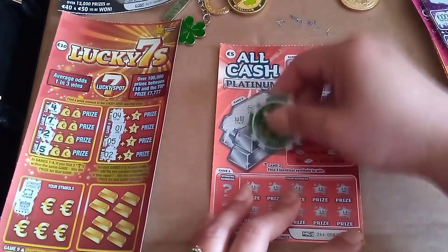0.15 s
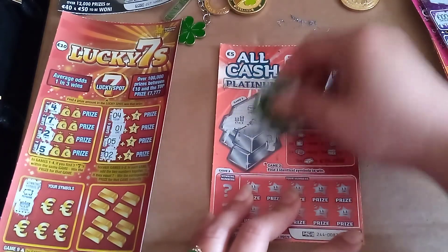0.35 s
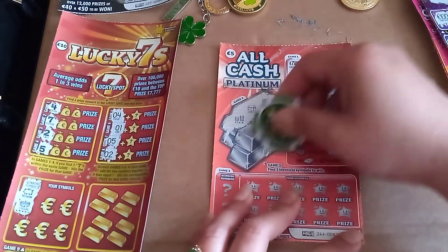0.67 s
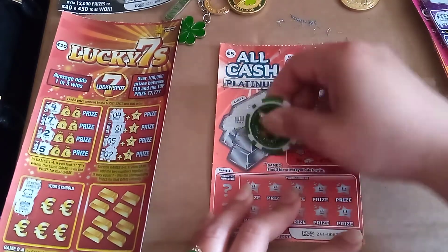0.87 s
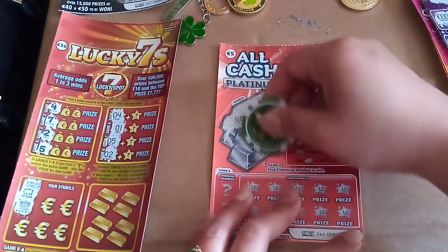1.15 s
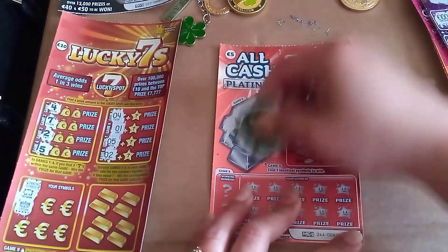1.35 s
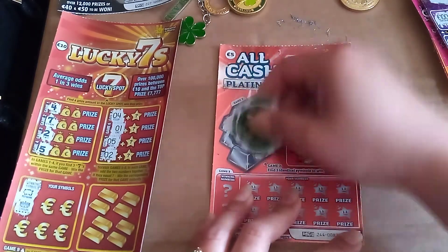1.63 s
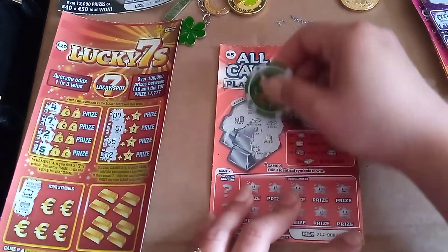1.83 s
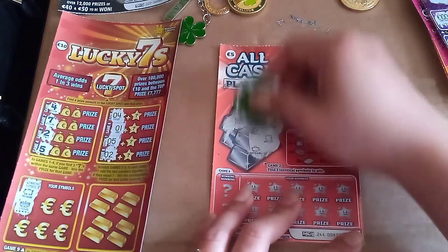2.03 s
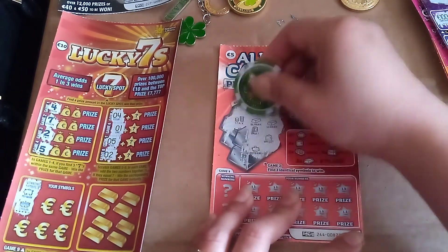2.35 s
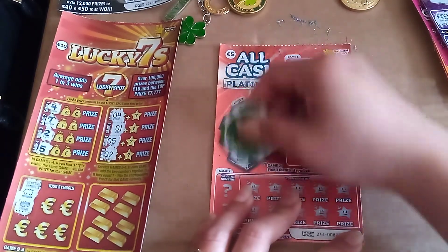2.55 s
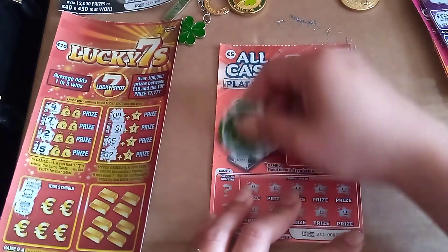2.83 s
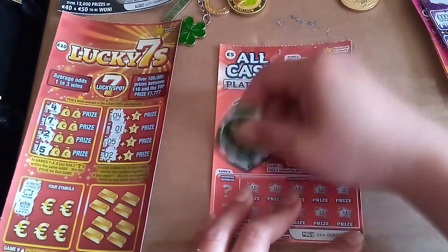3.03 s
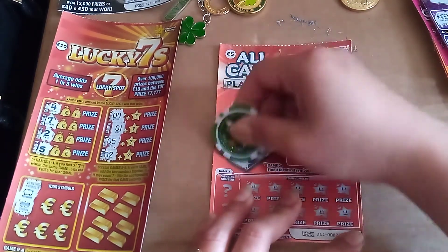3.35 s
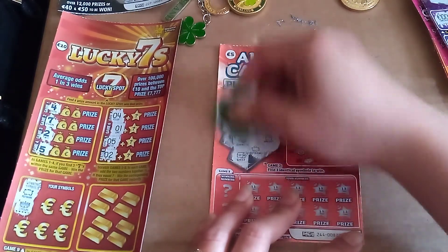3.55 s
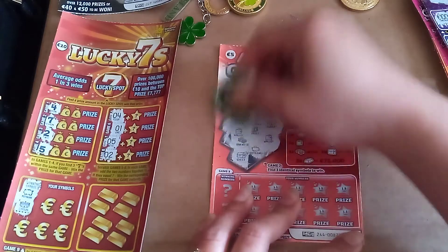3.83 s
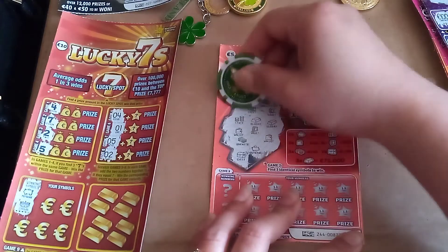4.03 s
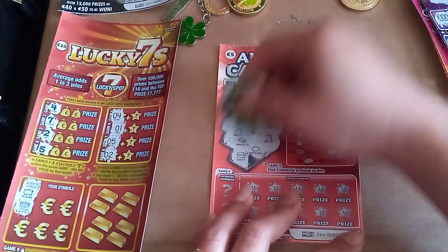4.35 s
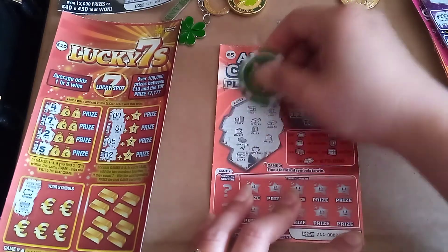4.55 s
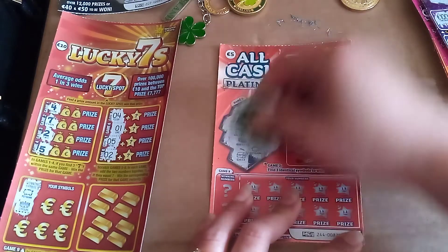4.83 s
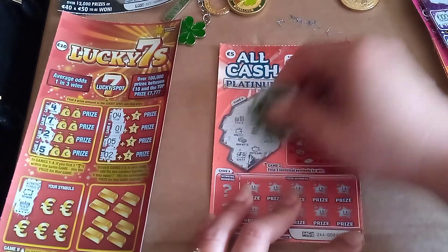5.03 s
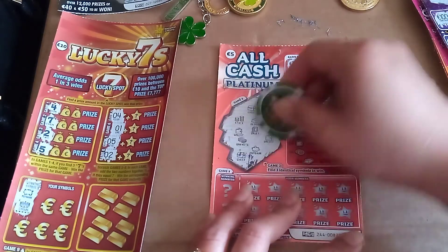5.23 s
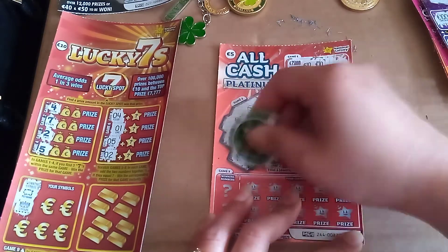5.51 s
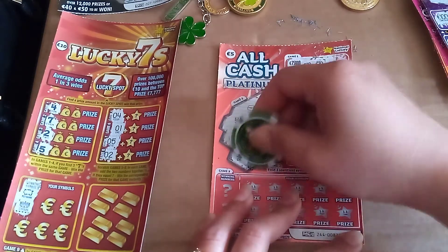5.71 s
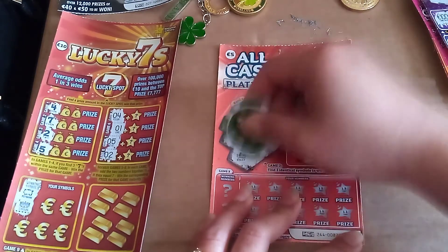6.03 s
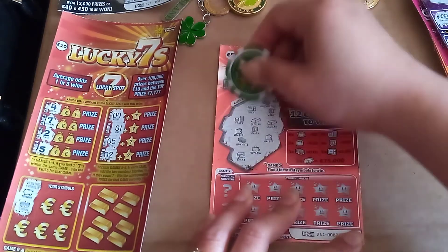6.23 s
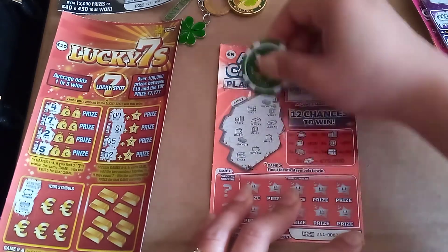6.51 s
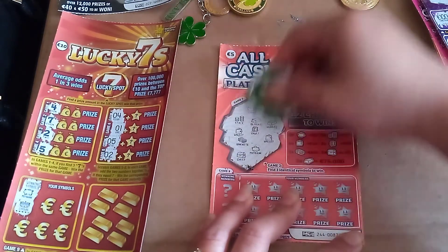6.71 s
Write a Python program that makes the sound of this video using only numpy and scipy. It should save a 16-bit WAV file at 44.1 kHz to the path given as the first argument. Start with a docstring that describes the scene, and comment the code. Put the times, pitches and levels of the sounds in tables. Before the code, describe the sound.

Close up in a quiet room, a scratch card is rubbed rapidly with the edge of a plastic chip. The dry, grainy strokes keep going throughout, uneven in strength, while the wooden table booms and thumps softly below them. The rim ticks now and then, most sharply just past the middle, and squeaks once very briefly a second later. The later strokes sound somewhat duller and softer.

```python
"""Scratching a card on a wooden table

A hard plastic chip scrapes the coating off a card in quick strokes to and fro. Torn grains of coating
ring in chip and card; the drag judders the table top, which booms in a few low modes. Now and then the
chip sticks and jolts the table, or its rim catches with a tick, once with a squeak. Close, in a quiet room.
"""
import sys
import numpy as np
from scipy import signal
from scipy.fft import rfft, irfft
from scipy.io import wavfile

SR = 44100
rng = np.random.default_rng(int(sys.argv[2]) if len(sys.argv) > 2 else 0)


def store_wav(level_fs):
    """Save 16-bit WAV to argv[1]."""
    pcm = np.round(np.clip(np.atleast_2d(level_fs), -1, 1) * 32767)
    wavfile.write(sys.argv[1], SR, pcm.T.astype(np.int16))


N = 303259

# One row a stroke. Crests are in stroke lengths from its start and may lie outside it. Columns:
# start_s, length_s, bite_s (attack), scrape_crest, scrape_db, bright_db,
# sizzle_crest, sizzle_db (relative to the scrape),
# boom_lead_s, boom_crest, boom_db, deep_db, groan_db (both relative to the boom)
STROKES = [(-0.03, 0.049, 0.073, 0.29, -52, 3, 1, -17.5, -0.02, 1.23, -49, -1, -8),
           (0.149, 0.021, 0.028, 0.75, -55, 0, 0.29, -10, 0.021, 1.1, -40, -2, -17),
           (0.25, 0.03, 0.045, 0.87, -57.5, 1, 1.3, -13.5, 0.048, 3.5, -44.5, -5.5, -14),
           (0.402, 0.016, 0.036, 0.5, -57, 3, 0.35, -2.5, 0.022, 2.9, -40, -5.5, -13.5),
           (0.472, 0.065, 0.032, 0.66, -57, 1, 0.74, -6.5, 0.031, 1.4, -45.5, -12, -4.5),
           (0.598, 0.042, 0.014, 1, -62, 7, 0.95, -13, -0.0021, 1.25, -44.5, -2, -16.5),
           (0.718, 0.04, 0.029, 0.76, -60, 1.5, 0.46, -9.5, 0.01, 1.35, -47, -8.5, -20),
           (0.848, 0.029, 0.039, 1.0, -66, 3, 0.84, -13, 0.033, 0.95, -49, -6, -28),
           (0.953, 0.025, 0.029, 0.71, -59.5, 1.5, 0.56, -9, 0.028, 2, -51, -5.5, -6),
           (1.076, 0.038, 0.023, 0.48, -52.5, -2.5, 0.55, -4, 0.0017, -0.76, -38, -3, -19),
           (1.219, 0.049, 0.038, 0.48, -57.5, -4.5, 0.23, -8.5, -0.0059, 0.1, -49, -12, -7),
           (1.359, 0.024, 0.042, 1.0, -51.5, 0, 0.6, -11, 0.0072, -0.1, -36, -3, -17),
           (1.477, 0.041, 0.057, 0.68, -54, 1.5, 0.69, -7.5, -0.013, 0.04, -47, -5, -11.5),
           (1.637, 0.026, 0.034, 0, -54, 3, 0.4, -7, 0.0093, 0.1, -41, -4, -13),
           (1.744, 0.045, 0.022, 0.54, -59, 3.5, 0.51, -12, 0.028, 1.5, -49.5, -6, -9),
           (1.908, 0.032, 0.017, 0.81, -58, 2.5, 0.084, -12, 0.0091, 1.0, -44.5, -5.5, -15),
           (2.041, 0.025, 0.058, 0.56, -59.5, 4.5, 0.71, -8.5, 0.026, 1.0, -51.5, -9, -13),
           (2.195, 0.024, 0.029, 0.27, -55, 4, -0.14, -7.5, 0.011, -0.35, -38.5, -2, -15.5),
           (2.301, 0.042, 0.081, 0.8, -55, 4, 0.9, -10.5, 0.013, 1.6, -47.5, -6, -10),
           (2.47, 0.037, 0.032, 0.65, -53.5, 0.5, 0.75, -5, 0.0092, 0.5, -42, -8.5, -17),
           (2.586, 0.057, 0.063, 0.37, -57.5, 4, 0.75, -5.5, 0.012, 0.53, -54, -5, -8),
           (2.746, 0.048, 0.025, 0.27, -60, 7.5, 0.4, -0.5, 0.0057, -0.35, -43, -4, -14.5),
           (2.874, 0.071, 0.025, 0.29, -61, 4, 0.43, -4.5, 0.024, 0.95, -57.5, -3, -4.5),
           (3.038, 0.019, 0.024, 1, -57, -4, 0.29, -11, 0.03, 1.57, -43, -3.5, -22),
           (3.154, 0.05, 0.032, 0.49, -58, -0.5, 0.69, -9.5, -0.028, 1.08, -52, -6.5, -8.5),
           (3.307, 0.027, 0.015, 0.36, -56.5, -2.5, 0.41, -7, 0.0023, 0.1, -41.5, -3, -15.5),
           (3.438, 0.031, 0.03, 0.61, -61, 5, 0.7, -7, 0.019, 0.7, -52, -4.5, -8.5),
           (3.582, 0.026, 0.013, 0.89, -62, 5.5, 0.57, -5, 0.0018, 0.9, -47, -4.5, -11),
           (3.699, 0.073, 0.023, 0.46, -57.5, -2, 0.26, -16.5, 0.013, 0.4, -50.5, -3, -7),
           (3.855, 0.047, 0.067, 1, -62.5, 0.5, 0.94, -6.5, 0.013, 1.56, -45, -3, -11.5),
           (3.981, 0.059, 0.029, 0.94, -60.5, 1, 0.22, -14, 0.031, 1.1, -50.5, -4.5, -10),
           (4.134, 0.019, 0.057, 0.63, -55.5, -5.5, 1.1, -25, 0.032, 2.1, -41.5, -1, -11),
           (4.229, 0.05, 0.048, 0.8, -56, -3, 0.21, -14.5, 0.014, 3, -38, -5.5, -8),
           (4.36, 0.041, 0.036, 0.97, -60, 0, 0.18, -25, 0.02, 0.86, -46, -2.5, -9),
           (4.501, 0.029, 0.041, 0.5, -57, -17, 0.62, -18, 0.017, 1.9, -50, -6.5, -5),
           (4.604, 0.042, 0.067, 1, -71.5, -5, 1.8, -26, 0.0098, 1.0, -48.5, -1, -16.5),
           (4.733, 0.032, 0.034, 0.81, -59, -6, 0.43, -22, 0.016, 0.7, -54.5, -8.5, -9.5),
           (4.824, 0.059, 0.017, 1.0, -64, 1.5, 1.28, -3, -0.0058, 1.4, -45.5, 6, -18.5),
           (4.934, 0.078, 0.025, 0.41, -62.5, -6.5, 0.42, -19, 0.008, 0.84, -55.5, -7.5, -13.5),
           (5.088, 0.028, 0.034, 0.94, -57.5, 3.5, 1, -8.5, 0.018, 0.5, -42.5, 1, -22),
           (5.194, 0.024, 0.038, 0.0, -59.5, -1, -0.066, -5, 0.028, 0.12, -52.5, -7.5, -16),
           (5.315, 0.022, 0.045, 1, -59, -2, 0.99, -11, 0.02, 1.8, -43, 0.5, -23.5),
           (5.393, 0.036, 0.067, 1.0, -66, -6, 0.22, -16, 0.034, 1.9, -52.5, -6.5, -21),
           (5.507, 0.028, 0.024, 1.0, -57, 1, 1.7, -10.5, 0.02, 0.6, -45, -2, -23),
           (5.608, 0.035, 0.026, 1.0, -69.5, -3, -0.1, -22, 0.021, 1.7, -58, -2.5, -11),
           (5.71, 0.028, 0.017, 1.0, -63, -10, 1.12, -16, 0.00052, 0.6, -47.5, -4, -27.5),
           (5.873, 0.17, 0.063, 0.0, -67.5, -8, 0.58, -14, 0.12, 0.0, -58.5, -4.5, -3),
           (6.013, 0.048, 0.045, 0.88, -58.5, -2, 0.87, -16, -0.0084, 0.8, -41.5, -2, -18.5),
           (6.177, 0.039, 0.082, 1, -64.5, 0, 0.67, -25, 0.0095, 1.27, -52, -7, -3),
           (6.299, 0.06, 0.029, 1.0, -54, -6.5, 1.05, -17, 0.011, 0.78, -41.5, -2, -12.5),
           (6.434, 0.073, 0.029, 0.51, -55, 0.5, 0.15, -12.5, 0.026, 1.08, -45, -4, -5.5),
           (6.591, 0.061, 0.05, 0.61, -60.5, -1.5, 0.78, -19, 0.029, 0.2, -46, -4.5, -10),
           (6.72, 0.064, 0.067, 1.0, -77.5, 2, 0.89, -13, -0.036, 1.0, -56, -11, -1),
           (6.863, 0.023, 0.035, 0.25, -72, -5, 0.67, -27, 0.0052, -0.5, -48.5, -1, -10.5)]
# The ring of chip and card: pitch_hz, width_hz, gain_db
CARD_MODES = [(1128, 150, -5.5), (1288, 88, 3), (1808, 200, -7), (2383, 70, -4.5), (2834, 88, -1),
              (3241, 128, 1.5), (4013, 106, -4), (4770, 880, -10), (5764, 60, 2), (6230, 230, -4),
              (6600, 1130, -10.5)]
# Treble peaks of a small microphone, which colour the finest grains: pitch_hz, width_hz, gain_db
SIZZLE_MODES = [(8300, 210, -17), (10700, 790, -11), (10960, 590, -11), (15740, 840, -0.5),
                (15640, 300, -9)]
# Deep modes of the table top: pitch_hz, width_hz, gain_db
DEEP_TABLE_MODES = [(63.4, 57, -21.5), (118.7, 24, -3.5), (148.8, 57, -3.5), (178.1, 33, -0.5)]
# Higher modes of the table top: pitch_hz, width_hz, gain_db
UPPER_TABLE_MODES = [(252, 25.6, -4), (293, 47, 2.5), (361, 62, -8)]


def amp(db):
    return 10 ** (np.asarray(db) / 20)


def unit_rms(x):
    return x / np.sqrt(np.mean(x ** 2) + 1e-20)


def filtered(x, kind, hz, order=2):
    return signal.sosfilt(signal.butter(order, hz, kind, fs=SR, output="sos"), x)


def drift(rate_hz):
    """Smooth random motion with a spread of about 1."""
    knot_hz = 200
    knots = rng.standard_normal(int(N / SR * knot_hz) + 2)
    pole = np.exp(-2 * np.pi * rate_hz / knot_hz)
    slow = signal.lfilter([1], [1, -2 * pole, pole * pole], np.tile(knots, 2))[len(knots):]
    return np.interp(np.arange(N) * knot_hz / SR, np.arange(len(slow)), unit_rms(slow))


def grains(per_s, spread_db):
    """Random clicks of uneven size and sign."""
    sizes = amp(spread_db * np.minimum(rng.exponential(1, N), 4)) * rng.choice([-1, 1], N)
    return unit_rms(sizes * (rng.random(N) < per_s / SR))


def impulses(start_s, level_db):
    """Single clicks of random sign at the given times."""
    force = np.zeros(N)
    force[np.round(start_s * SR).astype(int)] = amp(level_db) * rng.choice([-1, 1], len(start_s))
    return force


def resonate(x, hz, width_hz):
    """One ringing mode with a gain of 1 at its peak."""
    radius = np.exp(-np.pi * width_hz / SR)
    feedback = [1, -2 * radius * np.cos(2 * np.pi * hz / SR), radius ** 2]
    return signal.lfilter(np.array([1, 0, -1]) * (1 - radius ** 2) / 2, feedback, x + 1e-18)


def body(force, modes, wander_db, wander_hz):
    """All modes of a body; as the contact point moves, each is driven harder or softer."""
    ring = np.zeros(N)
    for k, (hz, width_hz, gain_db) in enumerate(modes):
        coupling = amp(2 * wander_db * np.tanh(drift(wander_hz) / 2))
        ring += (-1) ** k * amp(gain_db) * resonate(force * coupling, hz, width_hz)
    return ring


def rubbed(force, level_db, modes, wander_db, wander_hz):
    """A body driven along a level curve, with its gain to the steady force divided out."""
    steady_gain = np.std(body(force, modes, 0, wander_hz))
    return body(force * amp(level_db), modes, wander_db, wander_hz) / steady_gain


def stroke_envelope(lead_s, bite_s, crest, level_db, fall_db_per_s, slope_db_per_s):
    """A layer's level in dB: each stroke bites, swells to its crest, sags and lets go."""
    t = np.arange(0, N + 32, 32)[:, None] / SR
    start_s, length_s = np.transpose(STROKES)[:2]
    attack_db = 20 / np.maximum(bite_s, .002) * np.maximum(start_s - lead_s - t, 0)
    release_db = fall_db_per_s * np.maximum(t - start_s - length_s, 0)
    sag_db = slope_db_per_s * abs(t - start_s - crest * length_s)
    power = np.sum(amp(2 * (level_db - attack_db - release_db - sag_db)), axis=1)
    return np.interp(np.arange(N) / SR, t[:, 0], 10 * np.log10(power + 1e-14))


def stroke_glide(values):
    """One value a stroke, gliding from mid-stroke to mid-stroke."""
    start_s, length_s = np.transpose(STROKES)[:2]
    return np.interp(np.arange(N) / SR, start_s + length_s / 2, values)


def scrape(scrape_db, crest_db, bright_db, sizzle_db):
    """Dense grains of torn coating ring in chip and card; the finest ones sizzle above."""
    chatter_db = 1.62 * drift(43) + 1.3 * drift(30)  # the edge skips over the coating
    drive_db = scrape_db + chatter_db
    card = rubbed(grains(2600, 3.0), drive_db - 2.5, CARD_MODES, wander_db=4.3, wander_hz=6)
    # the card's many small modes flare up briefly as the edge crosses them
    small_modes = [(hz, 30 + 0.008 * hz, -np.log2(hz / 1000)) for hz in np.geomspace(1000, 6900, 24)]
    flares = rubbed(grains(2000, 3.0), drive_db - 5, small_modes, wander_db=6.3, wander_hz=6)
    mids, highs = [filtered(card + flares, kind, 4300, order=3) for kind in ("low", "high")]
    # away from the crest the edge tears less coating and sounds duller
    shelf_db = np.clip(0.12 * (scrape_db - crest_db), -7, 3) + bright_db
    # the card radiates little above its highest modes
    rasp = filtered(mids + highs * amp(shelf_db), "low", 7600, order=3)
    sizzle = rubbed(grains(7100, 1.1), sizzle_db + chatter_db, SIZZLE_MODES, wander_db=6.3, wander_hz=7.3)
    return rasp + sizzle


def table_judder(boom_db, deep_db, groan_db):
    """Stick and slip under the hand make the table top boom and the card groan."""
    # The card groaning against the table: pitch_hz, width_hz, gain_db
    groan_modes = [(418, 48, 3.5), (496.3, 34, -2.5), (551, 20.7, -5), (707.5, 48, -1), (809, 73, -7)]
    upper_share = np.sqrt(np.clip(1 - amp(2 * deep_db) - amp(2 * groan_db), .1, 1))
    deep = rubbed(grains(900, 1.93), boom_db + deep_db + .5, DEEP_TABLE_MODES,
                  wander_db=2.44, wander_hz=6.5)
    upper = rubbed(grains(900, 3.25) * upper_share, boom_db - .5, UPPER_TABLE_MODES,
                   wander_db=1.4, wander_hz=5.7)
    groan = rubbed(grains(700, 1.74), boom_db + groan_db - 2, groan_modes, wander_db=8.7, wander_hz=14.6)
    return filtered(deep + upper, "band", [55, 450]) + filtered(groan, "band", [380, 950])


def wall_reflections(x, t60_s):
    """The walls return a short, dull tail after 4 ms."""
    t = np.arange(int(.3 * SR)) / SR
    dull_noise = signal.lfilter([1], [1, -.5], rng.standard_normal(len(t)))
    tail = dull_noise * amp(-60 * t / t60_s) * (t > .004)
    return signal.fftconvolve(x, tail / np.sqrt(np.sum(tail ** 2)))[:N]


def room_tone(level_db):
    """A steady bed of low rumble and faint hiss."""
    # The room's noise spectrum: frequency_hz, relative_density_db
    spectrum = [(40, -17), (150, -8), (300, 1.5), (600, -54), (1300, -27.5), (6500, -20), (8000, -33),
                (13500, -37), (15300, -26.5)]
    hz, density_db = np.transpose(spectrum)
    bins_hz = np.fft.rfftfreq(N, 1 / SR) + 1
    colour = amp(np.interp(np.log(bins_hz), np.log(hz), density_db))
    return amp(level_db) * unit_rms(irfft(rfft(rng.standard_normal(N)) * colour, N))


def table_jolts():
    """The chip sticks and sends a soft thump into all modes of the table top."""
    # Blows to the table: start_s, force_db
    blows = [(0.165, -23), (0.41, -29), (0.545, -41), (0.619, -44), (0.868, -28), (1.079, -32),
             (1.243, -33), (1.361, -26.5), (1.627, -31), (1.934, -31.5), (2.182, -34), (2.467, -34),
             (2.742, -31), (3.308, -29.5), (3.6, -35), (3.898, -28.5), (4.16, -23.5), (4.625, -36.5),
             (4.881, -32), (5.104, -31), (5.327, -32), (5.504, -50), (5.715, -46), (6.042, -28),
             (6.225, -33.5), (6.323, -38), (6.353, -36), (6.593, -31.5)]
    force = impulses(*np.transpose(blows))
    thumps = body(force, DEEP_TABLE_MODES + UPPER_TABLE_MODES, wander_db=1.9, wander_hz=2.3)
    return amp(35) * filtered(thumps, "band", [55, 600])


def rim_ticks():
    """The chip's rim catches: a bare click and its short ring in card and microphone."""
    # Catches of the rim: start_s, force_db
    catches = [(1.269, -49), (1.356, -42.5), (1.743, -72), (1.909, -48.5), (2.4687, -61), (2.7437, -47),
               (3.304, -55), (3.437, -52), (3.5144, -66), (3.582, -52), (3.7973, -78), (3.9845, -35),
               (3.9863, -35.5), (3.9933, -40), (4.36, -62), (4.5223, -53), (4.824, -53), (4.9362, -58),
               (5.945, -67), (5.9594, -59), (5.9695, -52.5), (6.7357, -62), (6.791, -60)]
    start_s, force_db = np.transpose(catches)
    clicks = impulses(start_s + .0007, force_db)
    snap = filtered(clicks, "band", [1800, 6800])
    ring = body(clicks, CARD_MODES, wander_db=2, wander_hz=9)
    sparkle = body(clicks, SIZZLE_MODES, wander_db=2, wander_hz=9)
    return amp(15) * snap + amp(13) * ring + amp(9) * sparkle


def rim_squeak():
    """Once the rim catches and kicks a single narrow mode of the chip."""
    # The kick and its mode: start_s, pitch_hz, width_hz, force_db
    squeak = (4.9355, 2350, 110, -16)
    start_s, pitch_hz, width_hz, force_db = squeak
    kick = np.zeros(N)
    kick[round(start_s * SR)] = amp(force_db)
    return resonate(kick, pitch_hz, width_hz)


def scene():
    """The bright scratching and its reflections over the table's low end and the room tone, in mono."""
    (_, _, bite_s, scrape_crest, scrape_db, bright_db, sizzle_crest, sizzle_db,
     boom_lead_s, boom_crest, boom_db, deep_db, groan_db) = np.transpose(STROKES)
    scrape_curve = stroke_envelope(0, bite_s, scrape_crest, scrape_db,
                                   fall_db_per_s=248, slope_db_per_s=163)
    sizzle_curve = stroke_envelope(0, bite_s, sizzle_crest, scrape_db + sizzle_db,
                                   fall_db_per_s=389, slope_db_per_s=460)
    boom_curve = stroke_envelope(boom_lead_s, .03, boom_crest, boom_db,
                                 fall_db_per_s=230, slope_db_per_s=127)
    scratching = scrape(scrape_curve, stroke_glide(scrape_db), stroke_glide(bright_db), sizzle_curve)
    scratching += rim_ticks() + rim_squeak()
    low_end = table_judder(boom_curve, stroke_glide(deep_db), stroke_glide(groan_db)) + table_jolts()
    reflections = amp(-18.5) * wall_reflections(scratching, t60_s=0.036)
    return (scratching + low_end + reflections + room_tone(level_db=-81))[None]


def record(dry):
    """A steep low-pass trims the very top."""
    cutoff_hz = 15750
    return signal.sosfilt(signal.ellip(10, .5, 60, cutoff_hz, fs=SR, output="sos"), dry)


dry = scene()
out = record(dry)
store_wav(out)
```